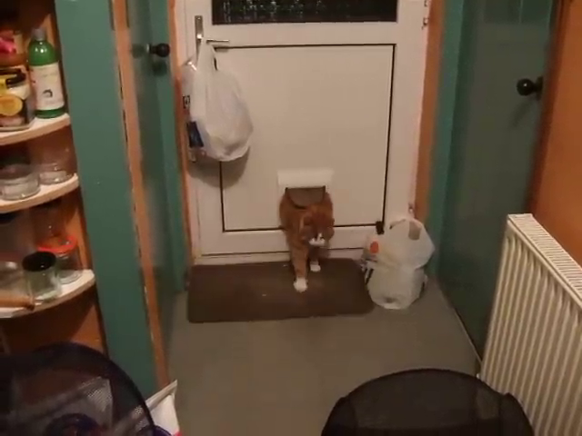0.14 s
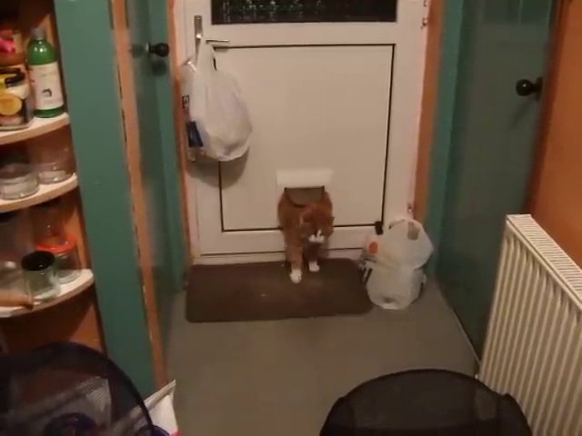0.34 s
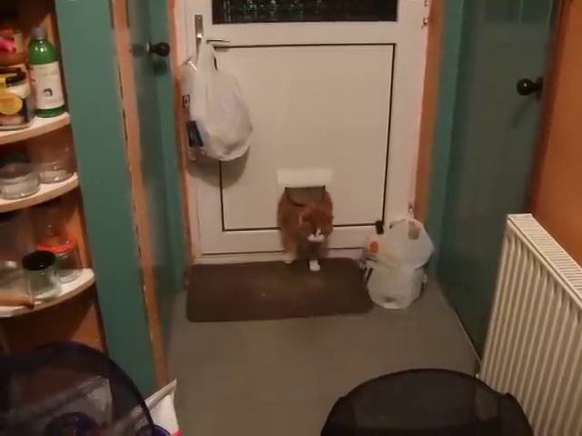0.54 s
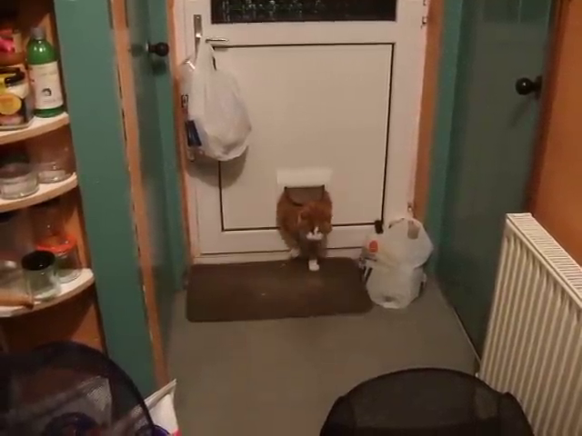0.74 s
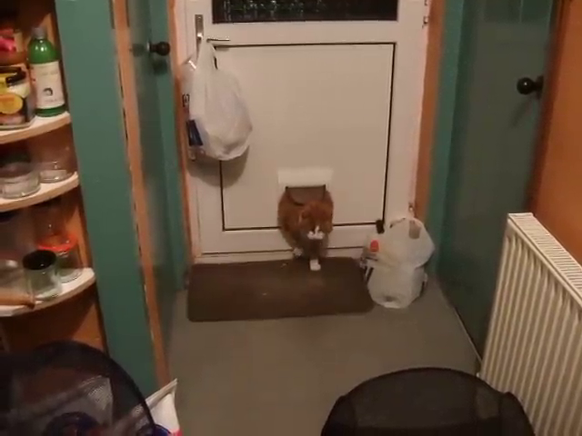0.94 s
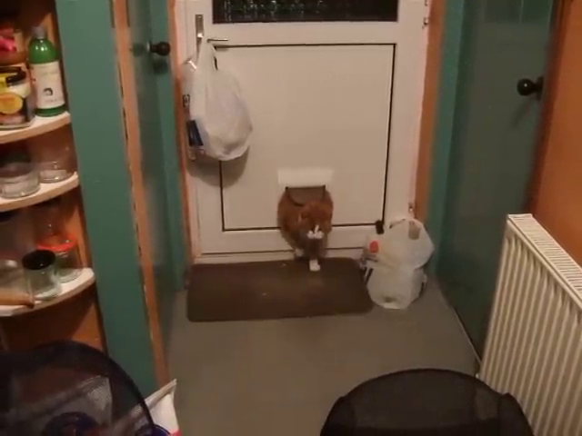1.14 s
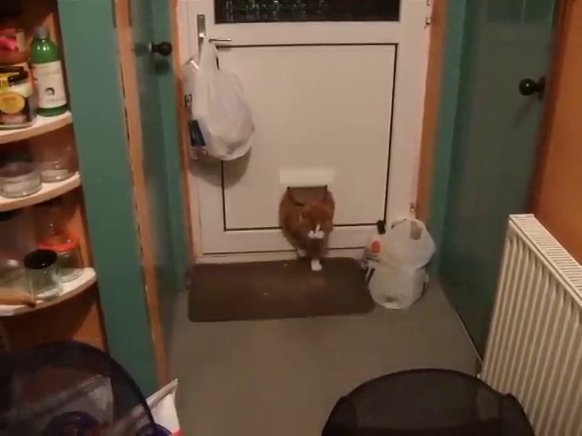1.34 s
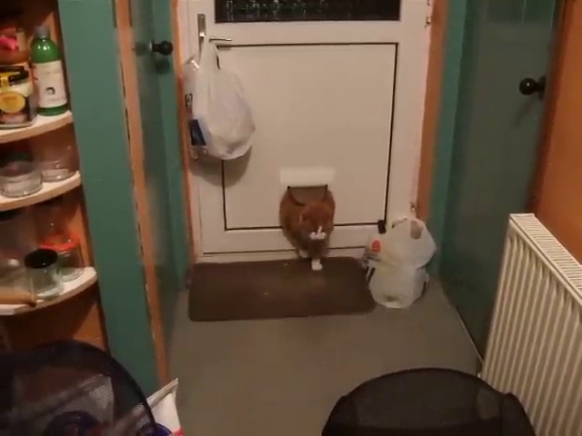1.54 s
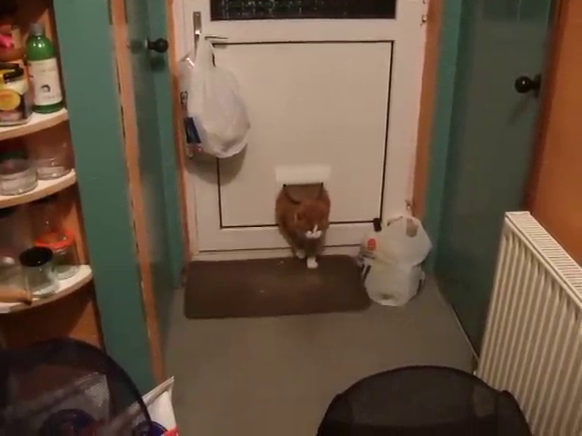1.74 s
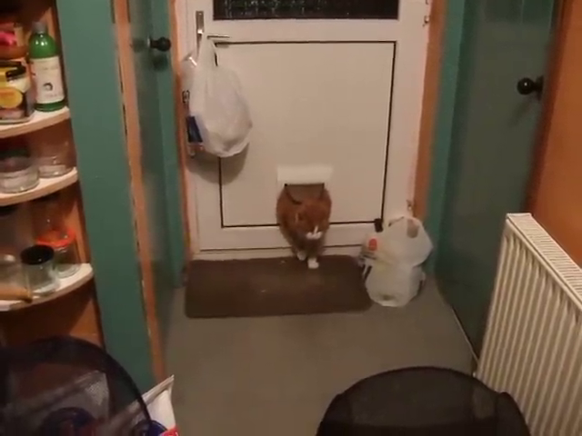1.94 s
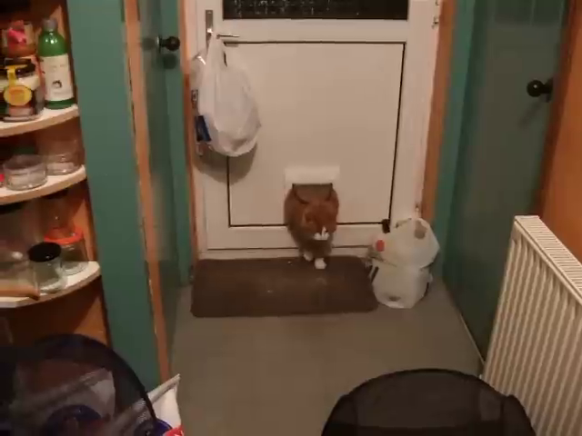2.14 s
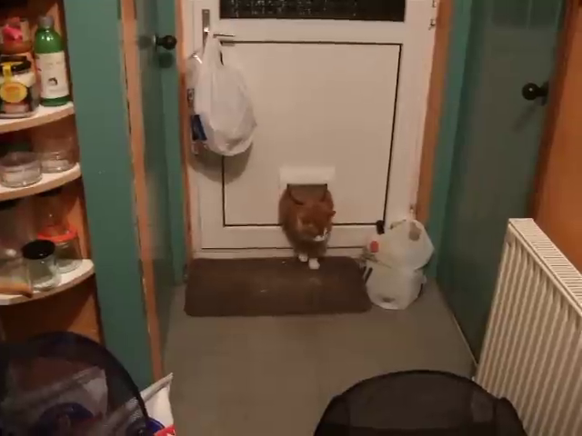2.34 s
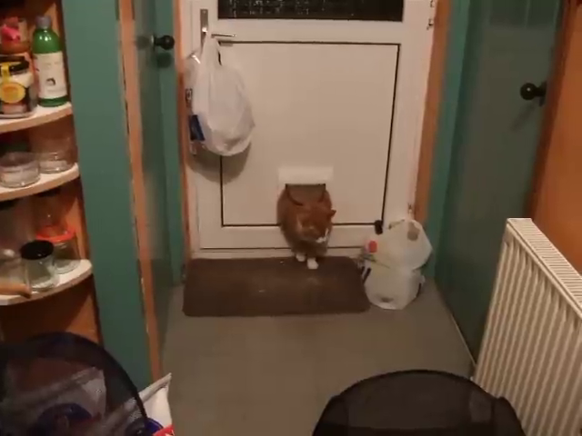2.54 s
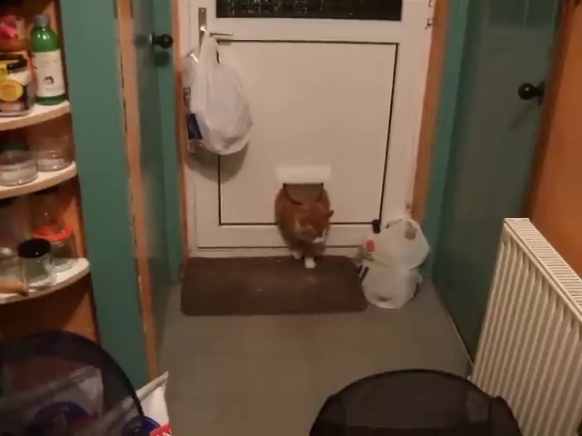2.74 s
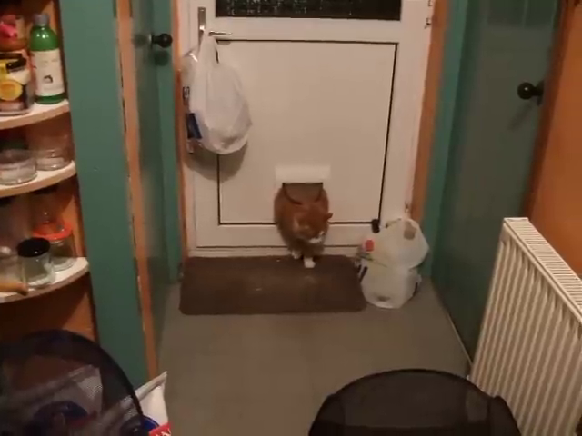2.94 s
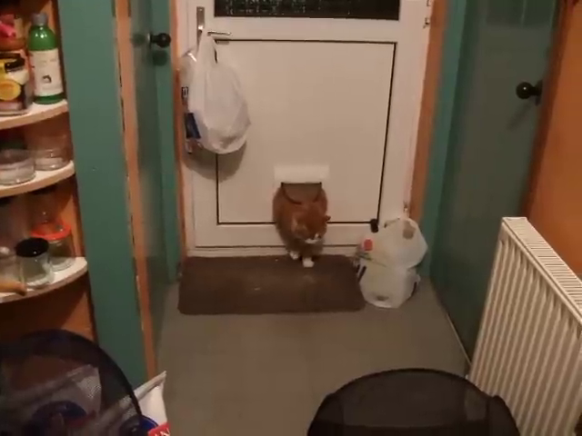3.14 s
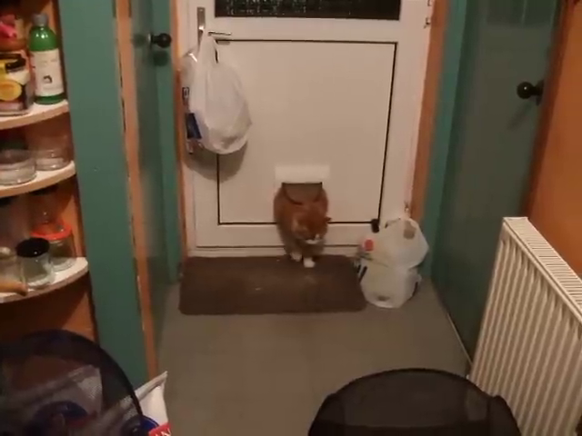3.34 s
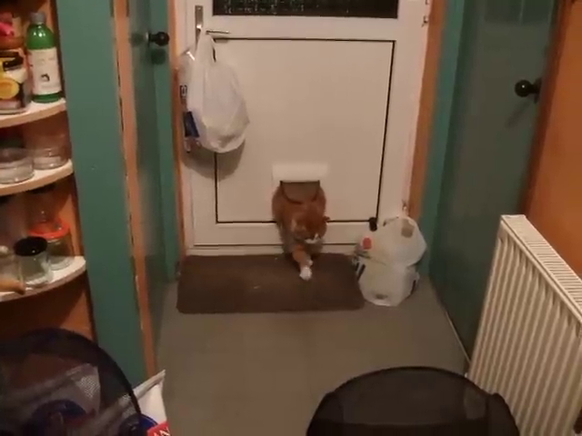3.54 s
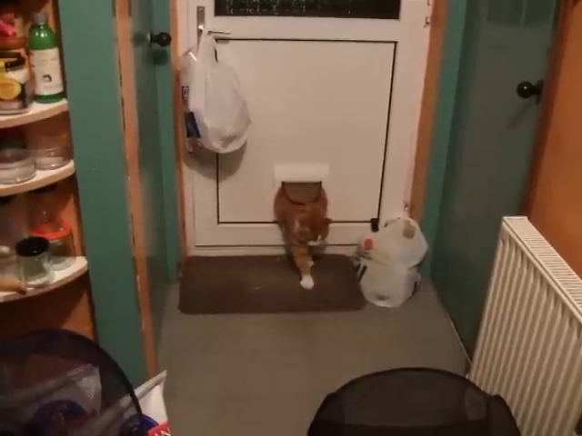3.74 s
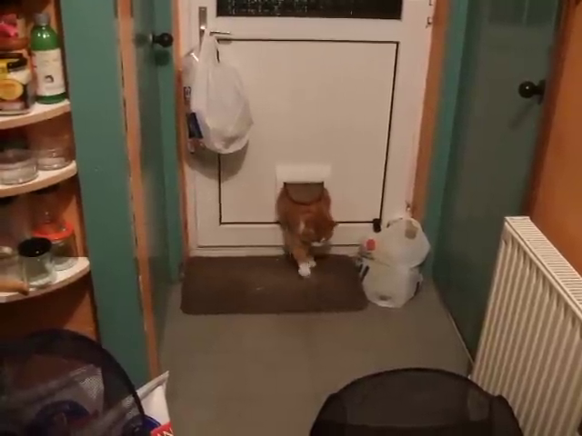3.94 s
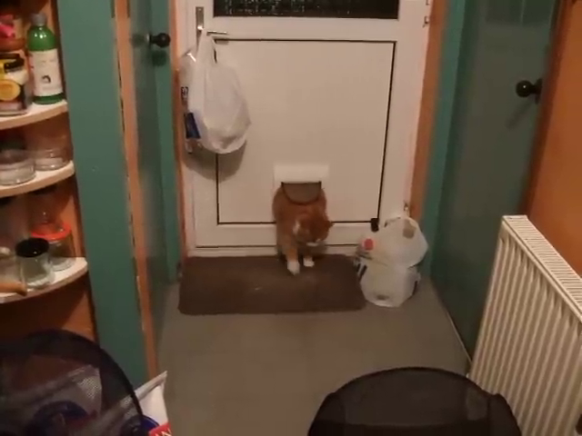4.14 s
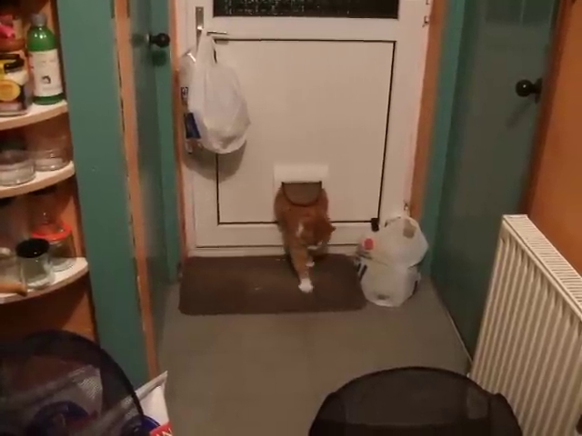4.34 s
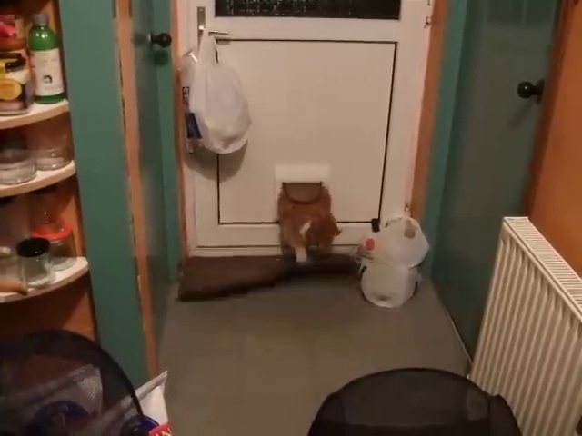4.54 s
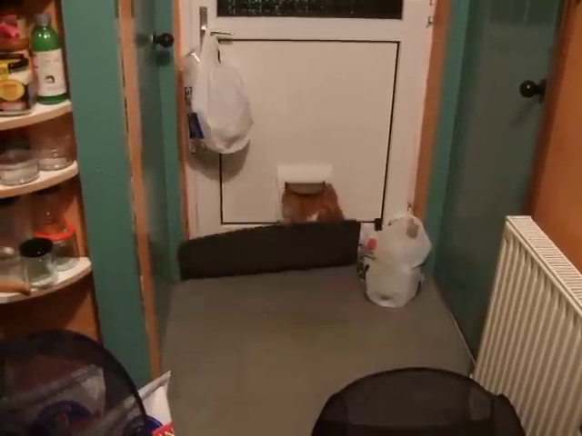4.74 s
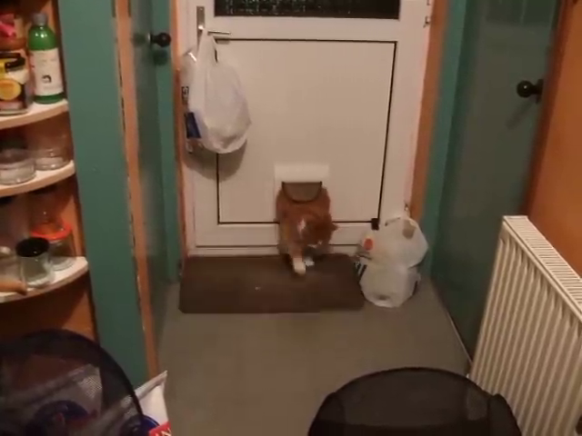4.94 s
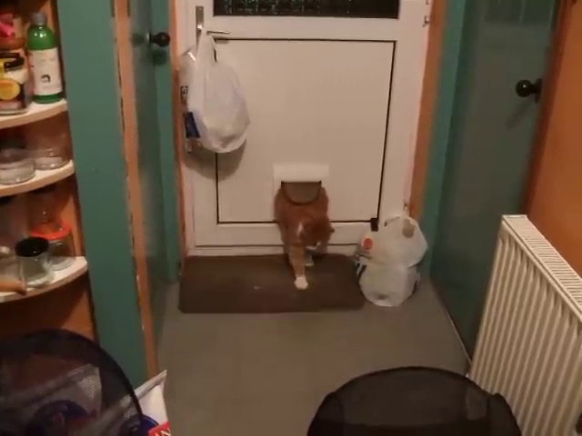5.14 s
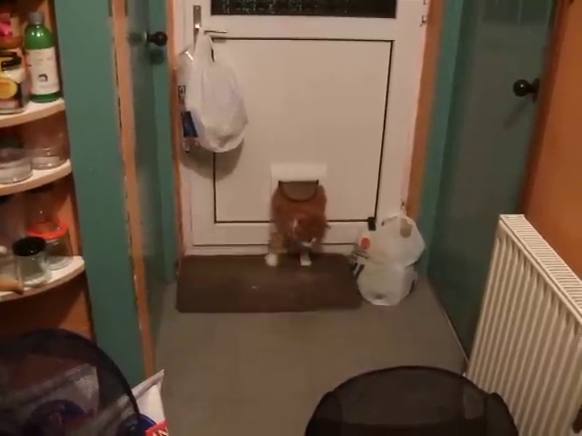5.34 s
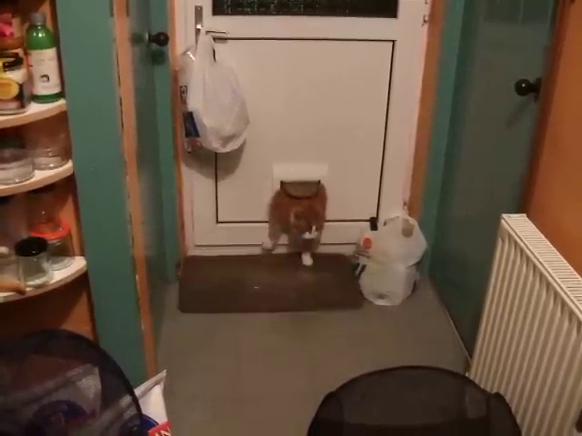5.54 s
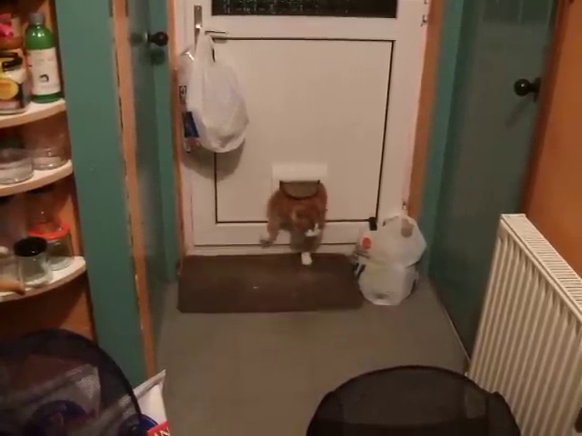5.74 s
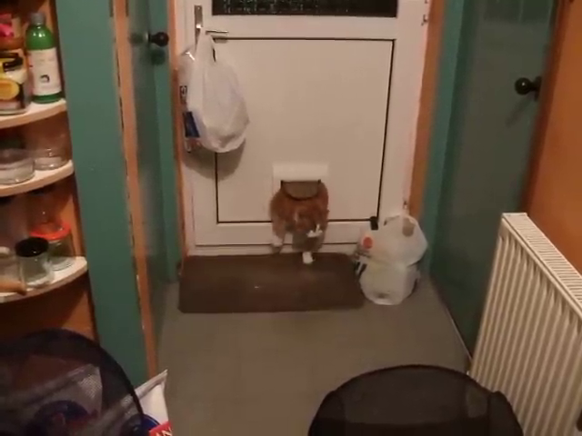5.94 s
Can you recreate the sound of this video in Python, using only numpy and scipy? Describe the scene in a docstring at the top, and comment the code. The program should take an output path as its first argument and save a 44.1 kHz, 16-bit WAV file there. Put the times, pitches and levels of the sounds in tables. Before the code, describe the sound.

A cat comes through a door flap, heard on a cheap, dull camera microphone with coarse hiss. An opening slap of the mat dies away in the small hard hallway; after a pause comes a soft, clear meow with a creaky end. Then scratchy claw pops, a rough sliding drag, a cluster of booming bumps, and a sharp ringing slap, followed by a few light scratches and a soft bump.

```python
"""At a back door, a cat halfway through the plastic flap meows once and claws at the doormat for a hold.
The rubber-backed mat drags over the floor in random slips and slaps down in bursts of tiny impacts.
Body, paws and mat bump with short booms; claws pluck the pile; the meow is a stack of gliding overtones.
A narrow hallway answers with noise that dies away, treble first, over room tone and a weak hum.
A small camera stores it all in coarse steps, which turns the quiet room tone into a gritty hiss."""
import sys
import numpy as np
from scipy import signal
from scipy.fft import rfft, irfft, next_fast_len
from scipy.io import wavfile
from scipy.ndimage import uniform_filter1d, map_coordinates

SR = 44100
rng = np.random.default_rng(int(sys.argv[2]) if len(sys.argv) > 2 else 0)


def generate_wav(signal):
    """Clip the signal to [-1, 1] and save it as 16-bit WAV at the path in sys.argv[1]."""
    frames = np.transpose(np.atleast_2d(signal))
    scaled = np.clip(frames, -1, 1) * 32767
    pcm = np.round(scaled).astype(np.int16)
    wavfile.write(sys.argv[1], SR, pcm)


N = 264159  # length in samples, about 6 s

# what a blow sets ringing in the door and hallway: f/Hz, level/dB, time to fade by 60 dB/s
DOOR_RINGS = [(90.5, -21, 0.7), (171.4, -21, 0.66), (303.3, -15, .45), (318.8, -16, .45),
              (359.3, -17.5, 0.52), (417, -15.5, .35), (430.5, -19, 0.57), (524, -16, 0.43)]


def slaps():
    """The mat lands flat: a broad crack knocks the floor and sets the hallway and its hard fittings ringing."""
    # the mat slapping the floor: t/s, level/dB, contact's time to fade by 60 dB/s, rise/s,
    # ringing/dB, floor knock/dB (the last two relative to the level)
    landings = [(0.0, -16, 0.11, 0.002, -6, 0.5), (4.984, -15.5, 0.068, 0.0011, 3, -4.5)]
    # balance of pitches in a slap: f/Hz, relative level per Hz/dB
    slap_colour = [(30, -9.5), (85, -4), (170, -6), (330, -8.5), (600, -3.5), (1100, -4), (1400, -5.5),
                   (1900, -11.5), (2700, -11.5), (3600, -12.5), (6000, -14.5), (7500, -10), (8000, -14.5)]
    # glass and metal nearby, set ringing by a hard slap: f/Hz, level/dB, time to fade by 60 dB/s
    bright_rings = [(1066, -22, .25), (1320, -22, .25), (4382, -23, .25), (6440, -20, .22), (7398, -12, .3),
                    (7460, -20, .2)]
    # hollow knock of the floor: f/Hz, level/dB, time to fade by 60 dB/s
    floor_rings = [(176, -16.5, .4), (380.5, -9, .33), (440, -15, .45), (925, -6.5, .2), (1211, -9.5, .16),
                   (1786, -15, .22), (1930, -15.5, .25)]
    crack_db, crack_t60_s = -6.5, .02  # the first instant of a slap
    out = np.zeros(N)
    colour = lambda hz: along(slap_colour, hz)
    for s, db, t60, rise, ring_db, knock_db in landings:
        add(out, s, amp(db) * blow(t60, rise, wet_db=-7, colour=colour))
        crack = blow(crack_t60_s, rise=.0003, wet_db=-30, colour=colour)
        add(out, s, amp(db + crack_db) * crack)
        ringing = amp(db + ring_db) * (ring(DOOR_RINGS) + ring(bright_rings))
        knock = amp(db + knock_db) * ring(floor_rings)
        add(out, s, ringing + knock)
    return out


def bumps():
    """Padded blows: a short boom under a knock that is duller and slower the softer the contact."""
    # soft bumps of body, paws and mat: t/s, level/dB, dull above f/Hz, boom f/Hz, boom relative level/dB
    padded_blows = [(1.564, -46.5, 600, 298, -3), (4.209, -33.5, 1200, 780, -4),
                    (4.287, -35, 2200, 141.4, 0), (4.605, -27.5, 1200, 396, 5), (4.636, -26, 800, 171.4, 8),
                    (4.789, -20.5, 5800, 362, 5), (4.81, -27.5, 1230, 303.6, 13),
                    (4.886, -25, 1220, 146.5, 2.5), (5.359, -44.5, 400, 335, -1.5),
                    (5.393, -41.5, 400, 294, -5.5), (5.42, -42, 398, 386, -7),
                    (5.844, -37, 1280, 196, -5.5)]
    # balance of pitches in a knock: f/Hz, relative level per Hz/dB
    bump_colour = [(40, -34), (90, -2.5), (200, -6), (400, 0), (600, -10.5), (850, -5), (1300, -14.5),
                   (2500, -16), (4000, -19), (8000, -27)]
    out, t = np.zeros(N), np.arange(SR // 2) / SR
    for s, db, dull_hz, boom_hz, boom_db in padded_blows:
        # 5 ms for a bump dull above 1 kHz; softer ones rise more slowly
        rise = .005 * (1000 / dull_hz) ** .35
        # bass under 150 Hz: less where the boom is strong or high
        weight_db = -0.5 - 1.1 * boom_db - 4.5 * np.log2(boom_hz / 300)

        def colour(hz):
            """The knock's colour with its bass weighted and its treble dulled."""
            bass_db = weight_db / (1 + (hz / 150) ** 4)
            dulling_db = 10 * np.log10(1 + (hz / dull_hz) ** 2)
            return along(bump_colour, hz) + bass_db - dulling_db

        add(out, s, amp(db) * blow(t60=.075, rise=rise, wet_db=-14.5, colour=colour))
        boom = amp(boom_db - 60 * t / 0.15) * np.sin(2 * np.pi * boom_hz * t)
        soft_start = 1 - np.exp(-t / rise)
        add(out, s, amp(db) * soft_start * (boom + amp(-2.5) * ring(DOOR_RINGS)))
    return out


def claws():
    """Each claw catches in the pile and tears free, plucking the mat with a hollow, scratchy pop."""
    # claws catching and tearing free: t/s, level/dB, rasp near 2 kHz/dB
    plucks = [(.252, -49.5, -2), (.326, -43, 4.5), (.352, -48, -8), (3.945, -30.5, -2), (3.97, -25, -.5),
              (4.454, -46, -1.5), (4.53, -38.5, 2), (4.58, -30.5, 6.5), (4.699, -33, -8.5),
              (5.249, -34, -3), (5.272, -39.5, -2), (5.295, -39.5, 4), (5.63, -43, 10)]
    # balance of pitches in a pluck: f/Hz, relative level per Hz/dB
    claw_colour = [(100, -30), (400, -21), (530, 0.5), (680, -5.5), (870, -2), (1150, -11.5), (1450, -15),
                   (2000, -15.5), (3000, -15), (4500, -25), (6500, -22.5), (8500, -24.5)]
    out = np.zeros(N)
    for s, db, rasp_db in plucks:
        rasp = lambda hz: rasp_db * np.exp(-np.log((hz + 1) / 1900) ** 2 / 0.46)
        colour = lambda hz: along(claw_colour, hz) + rasp(hz)
        add(out, s, amp(db) * blow(t60=.105, rise=0.0021, wet_db=-14.5, colour=colour))
    return out


def rubbing():
    """The mat grates over the gritty floor, harder at each tug; fur brushes the flap more finely."""
    # tugs that jerk the sliding mat along: t of peak/s, level/dB, time to swell by 20 dB/s,
    # time to fade by 20 dB/s
    jerks = [(4.589, -19, 0.0623, 0.1362), (4.703, -24, 0.03, 0.0532), (4.825, -29.5, 0.09, .25),
             (4.981, -24, 0.0768, 0.025)]
    # fur brushing through the flap: t/s, length/s, level/dB
    fur_strokes = [(.18, .14, -48.5), (4.48, 0.036, -53), (5.123, 0.13, -49.5), (5.253, .055, -44.5)]
    # balance of pitches in the rubbing: f/Hz, relative level per Hz/dB
    drag_colour = [(80, -16.5), (160, -10.5), (380, -4.5), (650, -7), (900, -0.5), (1300, -9.5),
                   (1800, -13), (2500, -7), (4000, -8.5), (6000, -6), (7100, -6.5), (7400, -0.5),
                   (7800, -6.5)]
    # the mat slides from the first pull until it slaps down
    slide = amp(-36) * envelope(s=4.545, hold=.435, attack=.018, release=0.011)
    tugs = [amp(db) * envelope(s, 0, swell, fade) for s, db, swell, fade in jerks]
    brushes = [amp(db) * envelope(s, length, attack=0.076, release=.06) for s, length, db in fur_strokes]
    # separate pulls combine by power
    grit = friction(rate=3500, spread_db=1.0) * np.linalg.norm([slide] + tugs, axis=0)
    fur = friction(rate=4900, spread_db=6.0) * np.linalg.norm(brushes, axis=0)
    slips = hall(grit + fur, wet_db=-1.5)
    rubbed = coloured(slips, lambda hz: along(drag_colour, hz))
    return np.std(slips) * unit(rubbed)  # the colour leaves the overall level alone


def friction(rate, spread_db):
    """Dense slips of random size, about rate of them a second, scaled to rms 1."""
    chance, sign, size = rng.random(N), rng.standard_normal(N), rng.standard_normal(N)
    return unit((chance < rate / SR) * sign * amp(spread_db * size))


def meow():
    """A clean falling cry; at its end the slack folds break the tone into a few creaky pulses."""
    t = np.arange(N) / SR
    meow_s, hold_s = 1.657, .445
    # the pitch starts high, settles, drifts slowly down and sags as the call runs out
    highest_s, settled_hz, start_extra_hz, settle_s = 1.6, 663.2, 115.8, .116
    drift_hz_per_s, sag_s, sag_hz_per_s = 46, 2.052, 520
    pitch = settled_hz + start_extra_hz * np.exp(-((t - highest_s) / settle_s) ** 2)
    pitch -= drift_hz_per_s * (t - meow_s)
    pitch -= sag_hz_per_s * np.clip(t - sag_s, 0, .5)
    # a last push of the voice just before it stops
    push_db = 4 * np.exp(np.minimum(t - meow_s - hold_s, 0) / 0.027)
    swell = envelope(meow_s, hold_s, attack=.12, release=.014)
    cry = amp(-50.5 + push_db) * swell * voice(pitch)
    pulses_per_s, creak_hz = 99, 561
    pulses = unit(np.sin(np.pi * pulses_per_s * t) ** 2)
    creak_swell = envelope(s=2.132, hold=0.011, attack=0.0066, release=.03)
    creak = amp(-50.5) * creak_swell * pulses * voice(creak_hz)
    return hall(cry + creak, wet_db=-11)


def voice(pitch, count=6):
    """Harmonics of a slightly unsteady pitch, lifted by the resonances and muffled as the mouth closes."""
    # resonances that the harmonics glide through: f/Hz, width/Hz, lift/dB
    resonances = [(1120, 60, 14), (1250, 70, 18), (1482, 70, 16), (1933, 45, 11.5), (2087, 170, 18),
                  (2611, 70, 13.5), (2790, 160, 11.5), (4100, 600, 14)]
    overtone_db_per_octave = -7.5
    # the mouth opens and closes once; the narrower it is, the more it muffles the treble
    widest_s, mouth_span_s, muffle_above_hz, muffle_db_per_octave = 1.81, .27, 1700, -23.5
    closed = np.minimum(((np.arange(N) / SR - widest_s) / mouth_span_s) ** 2, 2)
    phase = 2 * np.pi * np.cumsum(pitch * (1 + .0036 * wobble(70))) / SR
    out = np.zeros(N)
    for k in range(1, count + 1):
        lift_db = sum(db / (1 + (2 * (k * pitch - hz) / width) ** 2) for hz, width, db in resonances)
        octaves_above = np.log2(np.maximum(k * pitch / muffle_above_hz, 1))
        muffle_db = muffle_db_per_octave * closed * octaves_above
        weaker_db = overtone_db_per_octave * np.log2(k)
        strength = amp(weaker_db + lift_db + muffle_db + 2.3 * wobble(45))
        out += strength * np.sin(k * phase)
    return out


def blow(t60, rise, wet_db, colour):
    """A burst of tiny impacts as surfaces meet or part, with the hallway's tail, in the given colour (dB of Hz)."""
    t = np.arange(SR // 2) / SR
    contact = rng.standard_normal(len(t)) * amp(-60 * t / t60)
    echo = tail()[:len(t)] * (1 - np.exp(-t / .005))
    burst = (1 - np.exp(-t / rise)) * (contact + amp(wet_db) * echo)
    # a brief push holds all pitches evenly, so its chance peaks are levelled
    power = np.abs(uniform_filter1d(np.abs(rfft(burst)) ** 2, size=70))
    own_db = lambda hz: 10 * np.log10(np.interp(hz, np.fft.rfftfreq(len(t), 1 / SR), power))
    return struck(coloured(struck(burst), lambda hz: colour(hz) - own_db(hz)))


def ring(modes):
    """Fading tones, struck at slightly new strengths each time; overlapping echoes make each one waver."""
    t = np.arange(SR // 2) / SR
    sway = lambda: .3 * wobble(60, size=len(t))
    out = np.zeros(len(t))
    for hz, db, t60 in modes:
        fading = amp(db + rng.normal() - 60 * t / t60) * (1 + sway())
        out += fading * np.sin(2 * np.pi * hz * t + sway()) * rng.choice([-1, 1])
    return out


def hall(x, wet_db):
    """The direct sound plus the hallway's answer: every instant of it starts a dying echo."""
    echo = tail()
    return x + amp(wet_db) * signal.fftconvolve(x, echo / np.linalg.norm(echo))[:len(x)]


def tail():
    """A fresh blurred echo of the hallway: noise that dies away, its treble mostly sooner than its bass."""
    # how long the hallway sounds on: f/Hz, time to fade by 60 dB/s
    hall_fades = [(100, 0.4), (400, 0.37), (1000, 0.32), (3000, 0.34), (8000, 0.3)]
    hz, t, z = signal.stft(rng.standard_normal(SR // 2), SR, nperseg=256)
    fading = amp(-60 * t / along(hall_fades, hz)[:, None])
    return signal.istft(z * fading, SR, nperseg=256)[1]


def background():
    """Quiet room tone (coloured noise) with a weak, slightly unsteady hum (a few low tones)."""
    # balance of pitches in the room tone: f/Hz, relative level per Hz/dB
    room_colour = [(15, -10.5), (35, 5), (66, -7), (115, 0), (170, -7), (320, -3.5), (550, -9.5),
                   (900, -9.5), (1500, -17), (4000, -21), (8000, -20)]
    # faint hum: f/Hz, level/dB
    hum_tones = [(420.1, -57.5), (114.8, -66), (308.4, -68), (345, -68.5)]
    t = np.arange(N) / SR
    air = unit(coloured(rng.standard_normal(N), lambda hz: along(room_colour, hz)))
    hum = sum(amp(db) * np.sin(2 * np.pi * hz * t + .5 * wobble(5.2)) for hz, db in hum_tones)
    return amp(-52.5) * air + hum


def amp(db):
    """Decibels to gain."""
    return 10 ** (np.asarray(db) / 20)


def unit(x):
    """Scaled to rms 1 (rms is a kind of average loudness)."""
    return x / np.sqrt(np.mean(x ** 2) + 1e-20)


def struck(x):
    """Scaled to rms 1 over its first fiftieth of a second."""
    return x / np.sqrt(np.mean(x[:SR // 50] ** 2) + 1e-20)


def along(points, hz):
    """(Hz, value) points joined by straight lines on a log pitch axis and read at hz."""
    f, v = np.transpose(points)
    return np.interp(np.log(hz + 1), np.log(f + 1), v)


def coloured(x, gain_db):
    """x through a filter of gain gain_db(Hz) that never sounds ahead of its input."""
    m = 2 * next_fast_len(len(x))
    gain = np.maximum(amp(gain_db(np.fft.rfftfreq(m, 1 / SR))), 1e-6)
    # folding the cepstrum (spectrum of the log gain) onto positive times makes the filter causal
    cepstrum = irfft(np.log(gain))
    cepstrum[1:m // 2] *= 2
    cepstrum[m // 2 + 1:] = 0
    return irfft(rfft(x, m) * np.exp(rfft(cepstrum)), m)[:len(x)]


def wobble(rate, size=N):
    """A smooth random curve through rate random points a second."""
    knots = rng.standard_normal(int(size * rate / SR) + 4)
    return map_coordinates(knots, [np.arange(size) * rate / SR])


def envelope(s, hold, attack, release):
    """Full gain from s for hold seconds; attack and release are the times for 20 dB."""
    t = np.arange(N) / SR
    before, after = np.maximum(s - t, 0), np.maximum(t - s - hold, 0)
    return amp(-20 * (before / attack + after / release))


def add(track, s, sound):
    """Mix a sound into the track at time s."""
    start = max(round(s * SR), 0)
    track[start:start + len(sound)] += sound[:N - start]


def scene():
    """All sources at one microphone."""
    return (slaps() + bumps() + claws() + rubbing() + meow() + background())[None]


def record(dry):
    """The camera samples at 16 kHz in coarse steps, so faint sound toggles between two values and fizzes."""
    camera_hz, top_hz = 16000, 9000
    step = .00552  # one step of the camera's converter, as a share of full scale
    padded = np.pad(dry, ((0, 0), (0, 7 * SR - N)))  # to a whole 7 s
    slow = signal.resample(padded, 7 * camera_hz, axis=1)
    stepped = step * (np.floor(slow / step) + .5)
    whine = amp(-69) * np.cos(np.pi * np.arange(slow.shape[1]))  # a thin tone at half the sampling rate
    out = signal.resample_poly(stepped + whine, SR, camera_hz, axis=1, window=("kaiser", 6))
    hz = np.fft.rfftfreq(out.shape[1], 1 / SR)
    passband = np.clip((top_hz - hz) / 500, 0, 1)  # slopes to nothing over the last 500 Hz
    return irfft(rfft(out) * passband)[:, :N]


dry = scene()
out = record(dry)
generate_wav(out)
```